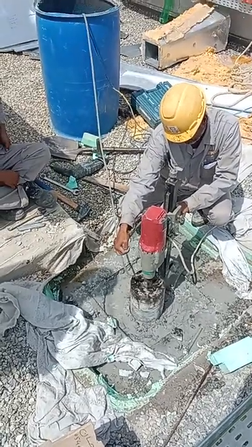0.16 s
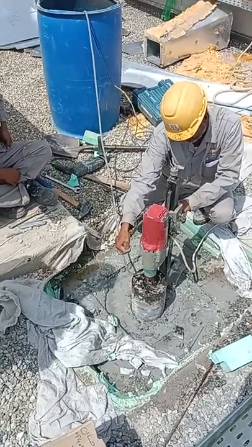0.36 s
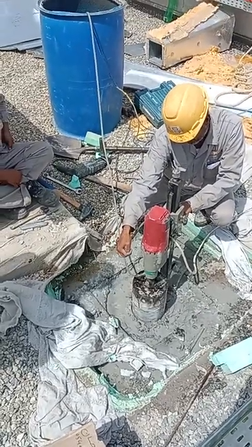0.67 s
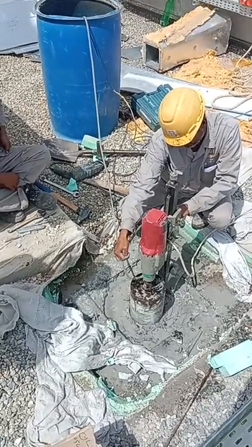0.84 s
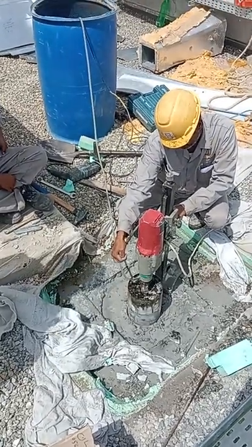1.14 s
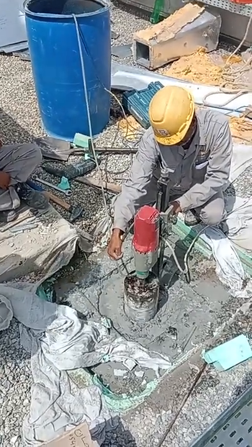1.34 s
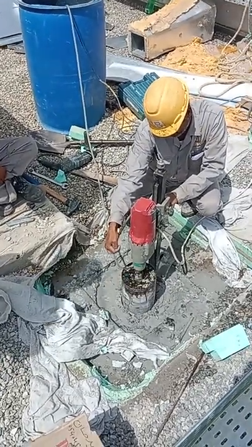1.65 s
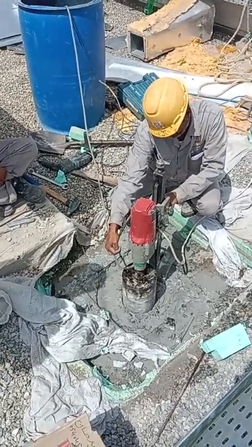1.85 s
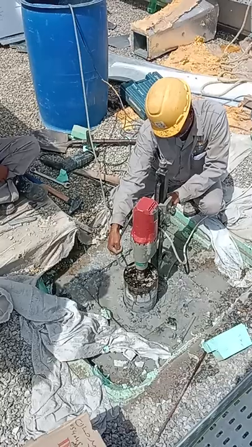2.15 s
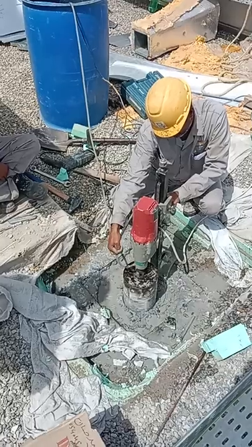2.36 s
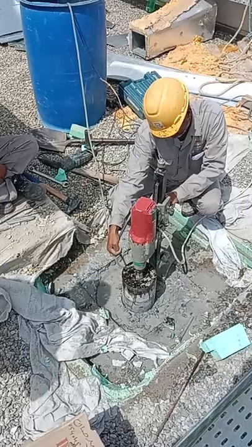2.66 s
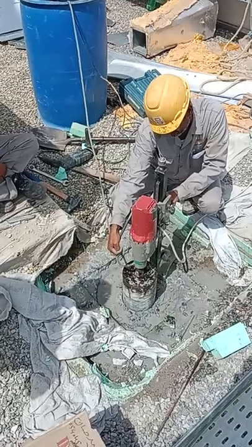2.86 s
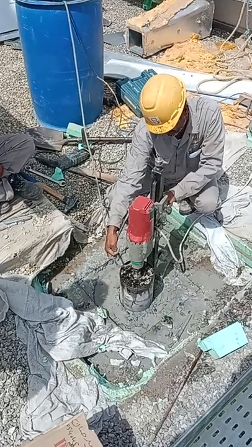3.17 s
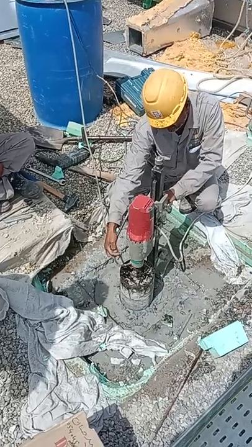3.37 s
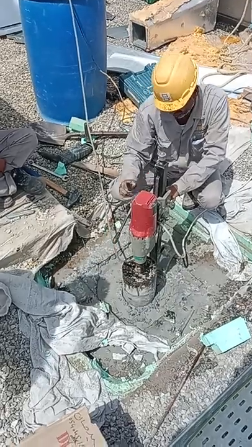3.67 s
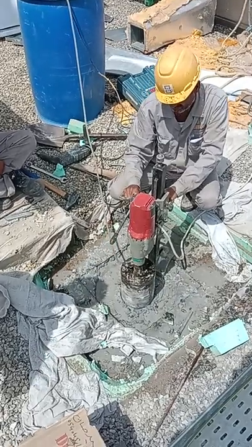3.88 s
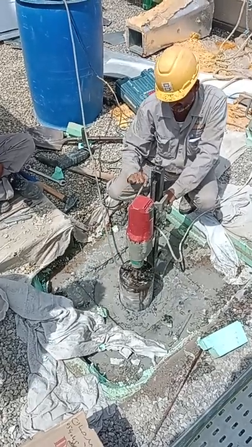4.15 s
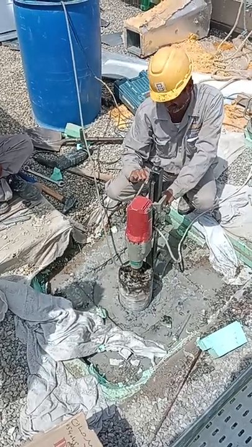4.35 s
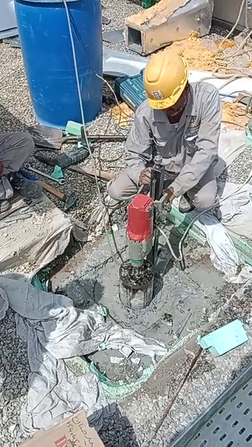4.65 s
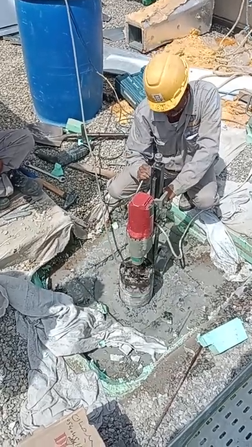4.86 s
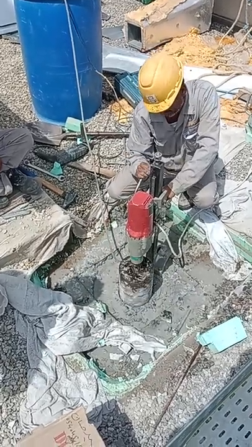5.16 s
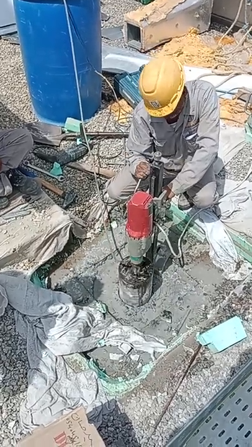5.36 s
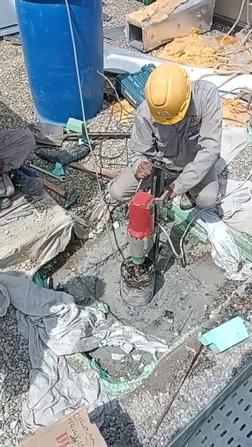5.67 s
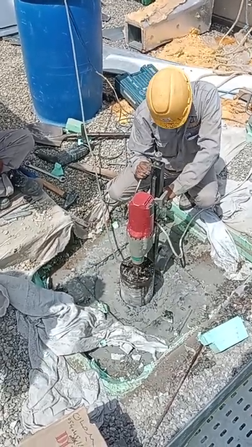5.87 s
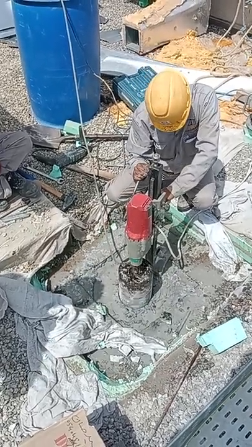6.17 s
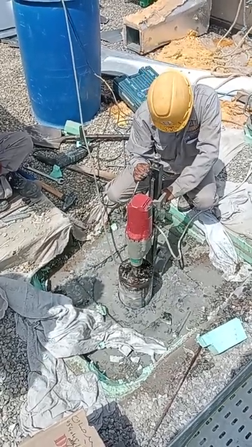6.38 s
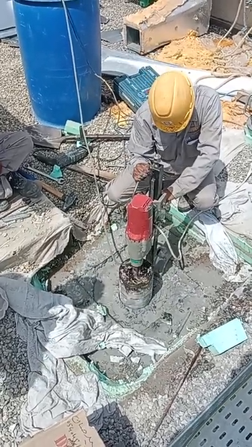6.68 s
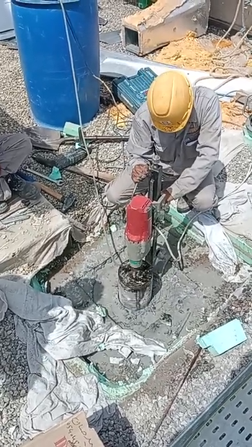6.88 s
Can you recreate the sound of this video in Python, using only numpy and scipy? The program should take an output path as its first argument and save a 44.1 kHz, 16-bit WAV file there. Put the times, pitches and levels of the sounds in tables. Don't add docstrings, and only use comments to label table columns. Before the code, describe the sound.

Outdoors, a stand-mounted electric core drill cuts wet concrete about two metres from a mono microphone. A harsh grind pulses roughly six times a second over low rumble, with gear rasp and airy hiss above. Past the middle it speeds up and the pulses grow lighter, with a faint rising squeak and a louder falling one, then slows again.

```python
import sys
import numpy as np
from scipy import signal
from scipy.fft import rfft, irfft, next_fast_len
from scipy.io import wavfile

SR = 44100
rng = np.random.default_rng(int(sys.argv[2]) if len(sys.argv) > 2 else 0)


def unload_wav(signal):
    wavfile.write(
        sys.argv[1],
        SR,
        np.round(np.clip(np.atleast_2d(signal).T, -1, 1) * 32767).astype(np.int16),
    )


N = 309582


def from_db(db):
    return np.exp(np.asarray(db) * (np.log(10) / 20))


def rms_one(x):
    return x / np.sqrt(np.mean(x ** 2) + 1e-20)


def bump(t, centre_s, half_s):
    return np.exp(-0.5 * ((t - centre_s) / half_s) ** 2)


def in_time(rows):
    time_s, *columns = np.transpose(rows)
    return [np.interp(np.arange(N) / SR, time_s, column) for column in columns]


def at_hz(points, hz):
    point_hz, value = np.transpose(points)
    return np.interp(np.log(hz), np.log(point_hz), value)


def drift(rate):
    r = np.exp(-80 * np.pi * rate / SR)
    noise = rng.standard_normal(N // 40 + 2002)
    slow = signal.lfilter([1], [1, -2 * r, r * r], noise)[2000:]
    return np.interp(np.arange(N) / 40, np.arange(len(slow)), rms_one(slow))


def grit(spread_db):
    size_db = spread_db * np.minimum(rng.exponential(1, N), 5)
    return rms_one(rng.standard_normal(N) * from_db(size_db))


def banded(spectrum, count, band_db, patchy_db, rate, grain_db):
    size = next_fast_len(N)
    hz = np.maximum(np.arange(size // 2 + 1) * SR / size, 1)
    low, high = spectrum[0][0], spectrum[-1][0]
    colour = from_db(at_hz(spectrum, hz)) * (hz >= low) * (hz <= high)
    place = (count - 1) * np.log(hz / low) / np.log(high / low)
    sources = [rfft(grit(grain_db), size) * colour for _ in range(2)]
    out = np.zeros(N)
    for k, centre in enumerate(np.geomspace(low, high, count)):
        share = np.sqrt(np.clip(1 - abs(place - k), 0, 1))
        band = irfft(sources[k % 2] * share, size)[:N]
        out += band * from_db(band_db(centre) + patchy_db * drift(rate))
    return out / np.sqrt(np.mean(colour ** 2))


def rings(modes, drive_db, patchy_db, rate, grain_db):
    out, contacts = np.zeros(N), grit(grain_db)
    for hz, width, level_db in modes:
        r = np.exp(-np.pi * width / SR)
        push = np.roll(contacts, rng.integers(N))
        push = push * from_db(level_db + drive_db + patchy_db * drift(rate))
        top = np.array([1, 0, -1]) * (1 - r * r) / 2
        out += signal.lfilter(top, [1, -2 * r * np.cos(2 * np.pi * hz / SR), r * r], push)
    return out


# centre_s [s], level_db [dB], half_length_s [s]
PUFFS = [(.9, -52, .05), (1.1, -45, .012), (1.19, -41, .018), (1.25, -40, 0.014), (1.288, -34, .025),
         (1.644, -36, .02), (1.8, -44, 0.055), (2.302, -42, 0.023), (3.21, -45, .008), (3.87, -43, 0.076),
         (4.75, -45, .04), (5.24, -50, .04)]


def wind():
    band = signal.butter(2, [55, 170], "band", fs=SR, output="sos")
    low = signal.sosfilt(band, rng.standard_normal(N))
    centre_s, level_db, half_s = np.transpose(PUFFS)
    gust = bump(np.arange(N)[::50, None] / SR, centre_s, half_s) @ from_db(level_db)
    return rms_one(low) * np.repeat(gust, 50)[:N]


# start_s [s], length_s [s], first_pitch_hz [Hz], last_pitch_hz [Hz], level_db [dB]
SQUEAKS = [
    (3.74, .24, 2120, 2310, -33),
    (4.879, .25, 2350, 2070, -27.5),
]


def squeaks():
    out, t = np.zeros(N), np.arange(N) / SR
    edge_s, swell_db = 0.036, 3.5
    for start, length, first_hz, last_hz, level_db in SQUEAKS:
        done = np.clip((t - start) / length, 0, 1)
        hz = first_hz + (last_hz - first_hz) * np.sin(np.pi / 2 * done) ** 2
        gate = np.clip(np.minimum(done, 1 - done) * length / edge_s, 0, 1)
        strength = gate * from_db(level_db + 2.2 + swell_db * (2 * done - 1) + 1.4 * drift(30))
        out += strength * np.sin(2 * np.pi * np.cumsum(hz + 10 * drift(50)) / SR)
    return out


# time_s [s], speed [turns per s], wobble [0-1]
SPINDLE = [
    (0, 5.93, 1),
    (3.45, 5.93, 1),
    (4.0, 7.6, 1),
    (4.7, 8.2, .8),
    (5.1, 8, .4),
    (5.6, 6, .6),
    (7.02, 6, 1),
]
# pitch_hz [Hz], level_db [dB per Hz]
RASP = [(1290, -25), (2200, -2.5), (2520, -6.5), (3150, 1.5), (3750, -3.5), (4240, 4), (4510, 4.5),
        (5020, -1), (5320, -13.5), (5900, -25), (7670, -41), (13000, -120)]
# pitch_hz [Hz], width_hz [Hz], level_db [dB]
CASE = [(2700, 90, -7), (3177, 290, -12.5), (4970, 180, -5.5), (5475, 120, -9.5)]
# pitch_hz [Hz], level_db [dB per Hz]
HISS = [(3240, -18.5), (5500, -12.5), (6070, -11), (7070, 0), (7520, 2), (8100, -4.5), (8790, -1),
        (9080, -10.5), (9600, -27), (12500, -42), (21100, -120)]
# pitch_hz [Hz], level_db [dB per Hz]
SPRAY = [(8800, -12), (9400, -5), (9850, -1), (10400, -1), (11300, -6), (11650, -5), (12000, -1),
         (12950, 0), (13200, -2), (13750, -11), (14050, -11), (14500, -6), (15250, -3), (15700, -3)]


def motor(rasp_db, hiss_db, ring_rub):
    turns, wobble = in_time(SPINDLE)
    angle = 2 * np.pi * np.cumsum(turns) / SR
    air_db = wobble * (0.7 * np.cos(2 * angle) + 0.7 * np.cos(3 * angle - 2.9))
    fling_db = wobble * (1.3 * np.cos(angle) + 0.6 * np.cos(2 * angle - 1.2))
    shared = 0.37 * drift(38)

    def felt(hz):
        return ring_rub * np.clip((4000 - hz) / 7000, 0, 1)

    def blown(hz):
        return air_db + shared

    def thrown(hz):
        return 0.78 * shared + (fling_db if hz > 11500 else 0.6 * air_db)

    rasp = banded(RASP, count=6, band_db=felt, patchy_db=1.4, rate=40, grain_db=2.5)
    case = rings(CASE, 0.12 * ring_rub + 14, patchy_db=1.5, rate=24, grain_db=2.5)
    hiss = banded(HISS, count=6, band_db=blown, patchy_db=0.9, rate=32, grain_db=3.0)
    spray = banded(SPRAY, count=5, band_db=thrown, patchy_db=1.1, rate=30, grain_db=3.0)
    gears = from_db(rasp_db) * (from_db(-0.5) * rasp + case)
    return gears + from_db(hiss_db) * (hiss + from_db(-13.5) * spray)


# time_s [s], slab_weight_db [dB], cutting_effort_db [dB]
FEED = [(0.0, -35, -17), (0.58, -33, -17), (0.9, -33.5, -16), (1.68, -33, -17), (2.4, -34.5, -16.5),
        (3.32, -33.5, -17), (3.89, -36, -17), (4.63, -33, -15.5), (4.91, -31.5, -15.5),
        (5.22, -32.5, -16.5), (6.14, -33, -17), (6.78, -34.5, -16), (6.88, -33.5, -17), (7.02, -38, -15.5)]
# centre_s [s], rise_db [dB], half_length_s [s]
PUSHES = [
    (1.0, 3.5, 0.18),
    (3.5, 4.5, 0.19),
    (4.6, 8.5, 0.32),
    (6.2, 3.5, 0.37),
]


def feed():
    weight, effort = (column - column.mean() for column in in_time(FEED))
    faster = in_time(SPINDLE)[0] - SPINDLE[0][1]
    t = np.arange(N) / SR
    pushed = sum(rise_db * bump(t, centre, half) for centre, rise_db, half in PUSHES)
    sag_db = 0.22 * (t - t.mean())
    rumble_db = -31 + 0.87 * weight
    ring_db = -23 + 0.82 * effort + 0.5 * faster
    rasp_db = -24 + effort + 0.56 * faster
    hiss_db = -21.5 + 0.52 * effort + 0.1 * faster - sag_db
    hum_db = -38 + 2.9 * weight - 6.5 * faster
    column_db = -38 + pushed
    return rumble_db, ring_db, rasp_db, hiss_db, hum_db, column_db


# time_s [s], slab_stand_rise_db [dB], barrel_rise_db [dB]
FIRM_RUBS = [(.024, 2, 2.5), (.052, 6.5, 5), (.216, 8.5, 7), (0.387, 8, 5.5), (.552, 8, 9), (.722, 5, 3),
             (.889, 5.5, 6), (1.052, 7, 3.5), (1.22, 6, 5.5), (1.382, 6.5, 3.5), (1.561, 6, 11),
             (1.732, 6, 10.5), (1.899, 6.5, 8), (2.063, 5, 6), (2.241, 6, 9), (2.409, 7, 7.5),
             (2.578, 6.5, 7.5), (2.747, 7.5, 5), (2.921, 4, 3), (3.087, 4, 5.5), (3.257, 6.8, 5.5),
             (3.425, 3.5, 3)]
# time_s [s], slab_stand_rise_db [dB], barrel_rise_db [dB]
LIGHT_RUBS = [(3.498, 0.5, 2), (3.659, 4.3, -1), (3.704, 2, 2), (3.829, 3, 2.5), (3.949, 4, 5.5),
              (4.078, 3, 1), (4.112, 1.1, 1), (4.214, 3.5, 1.5), (4.338, 4, 2), (4.468, 3.5, -1),
              (4.576, 2, 2), (4.703, 3.5, 1.5), (4.829, 4, -2), (4.957, 4, 2.5), (5.037, 3.2, 2.5),
              (5.097, 3, 2.5), (5.239, 4.5, 0.5), (5.421, 2.5, 1.5), (5.609, 1.5, 3), (5.728, 2.5, 0),
              (5.847, 1.7, 0.5), (5.925, 2.1, 1.5), (6.013, 2.5, 1.5), (6.185, 3, 4), (6.26, 1.7, 1),
              (6.42, 2.5, 4.5), (6.606, 2.7, 0.5), (6.761, 2.5, 2.5), (6.824, 0, 2.5), (6.929, 4, 0.5)]
# rise_s [s], fall_s [s]
RUB_SHAPE = [
    (.019, .016),
    (.017, .014),
    (.016, .01),
]


def rubs():
    firm = np.array(FIRM_RUBS)
    # delay s, low dB, barrel dB
    far = [0.083, 2.5, 0.8] + rng.standard_normal((len(firm), 3)) * [0.0089, 0.7, 0.7]
    far[:, 0] += firm[:, 0]
    time_s, low_db, barrel_db = np.vstack([firm, far, LIGHT_RUBS]).T
    split_db = 0.35 * rng.standard_normal(len(time_s))
    rises_db = 0.99 * low_db + split_db, 1.15 * low_db - split_db, barrel_db
    coarse = np.arange(N)[::50]
    ago = coarse[:, None] / SR - time_s
    scrapes = 1 + 0.2 * drift(140)
    felt = []
    for (rise_s, fall_s), rise_db in zip(RUB_SHAPE, rises_db):
        swell = bump(ago, 0, np.where(ago < 0, rise_s, fall_s))
        felt.append(scrapes * np.interp(np.arange(N), coarse, swell @ rise_db))
    return felt


# pitch_hz [Hz], share [of the rise]
RUB_REACH = [(110, .1), (190, 0.63), (280, 1.77), (550, 1.12)]
# time_s [s], level_db [dB]
DEEP_LEVEL = [
    (0, 2),
    (4.3, 3.5),
    (5.3, -1),
    (6.3, -5),
    (7.02, 2),
]
# pitch_hz [Hz], level_db [dB per Hz]
RUMBLE = [(24, -72), (40, -33), (203, -6.5), (288, -7.5), (337, -8), (521, -7), (912, -8.5), (1120, -19),
          (1320, -9), (1620, -9), (1870, -3.5), (2420, -17), (2600, -27), (3380, -51), (5720, -120)]
# pitch_hz [Hz], width_hz [Hz], level_db [dB]
STAND = [(656, 74, -4), (913, 39, 0), (1024, 53, -3)]
BARREL = [(1354, 87, -4.5), (1469, 158, -4.5), (1898, 87, -3), (2059, 63, -4.5), (2234, 230, -13.5)]
# pitch_hz [Hz], width_hz [Hz], level_db [dB]
SINGING = [(1313, 46, 0.5), (1843, 55, 1)]
# pitch_hz [Hz], width_hz [Hz], level_db [dB]
HUM = [(200.3, 20, 0)]
COLUMN = [(809, 51, 0)]


def grinding(rumble_db, ring_db, hum_db, column_db, slab_rub, stand_rub, ring_rub):
    deep_db, = in_time(DEEP_LEVEL)

    def reach(hz):
        if hz < 550:
            return at_hz(RUB_REACH, hz) * slab_rub * (hz > 130) + deep_db * (hz < 160)
        return stand_rub if hz < 1170 else ring_rub

    rumble = banded(RUMBLE, count=12, band_db=reach, patchy_db=0.55, rate=29, grain_db=2.5)
    stand = rings(STAND, 1.45 * stand_rub + 16, patchy_db=1.5, rate=2.8, grain_db=4.0)
    flutter = 0.67 * drift(33)
    barrel = rings(BARREL, 0.96 * ring_rub + flutter + 17, patchy_db=0.2, rate=13.0, grain_db=2.5)
    barrel += rings(SINGING, ring_rub + 0.68 * flutter + 17, patchy_db=1.7, rate=15, grain_db=1.5)
    hum = rings(HUM, hum_db + 25.5, patchy_db=-0.3, rate=9.8, grain_db=2.5)
    column = rings(COLUMN, column_db + 19.5 + 1.23 * stand_rub, patchy_db=1.0, rate=9, grain_db=1.0)
    low = from_db(rumble_db) * (from_db(1.0) * rumble + stand)
    return low + from_db(ring_db) * barrel + hum + column


def scene():
    rumble_db, ring_db, rasp_db, hiss_db, hum_db, column_db = feed()
    slab_rub, stand_rub, ring_rub = rubs()
    mono = wind() + squeaks() + motor(rasp_db, hiss_db, ring_rub)
    mono += grinding(rumble_db, ring_db, hum_db, column_db, slab_rub, stand_rub, ring_rub)
    return np.array([mono, mono])


def band_limit(x):
    return signal.sosfilt(signal.butter(12, 15710, fs=SR, output="sos"), x)


def record(dry):
    x = signal.sosfilt(signal.butter(2, 85, "high", fs=SR, output="sos"), dry)
    x = 1.6 * np.tanh(x / 1.6)
    x = signal.sosfilt(signal.ellip(12, 0.5, 80, 15490, fs=SR, output="sos"), x)
    return band_limit(x)


dry = scene()
out = record(dry)
unload_wav(out)
```